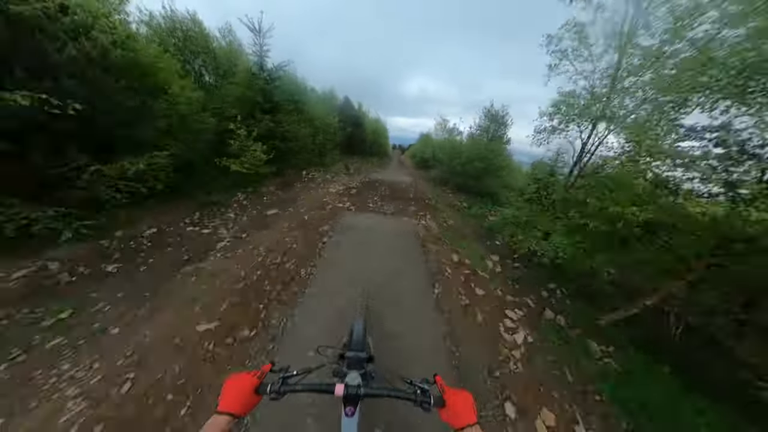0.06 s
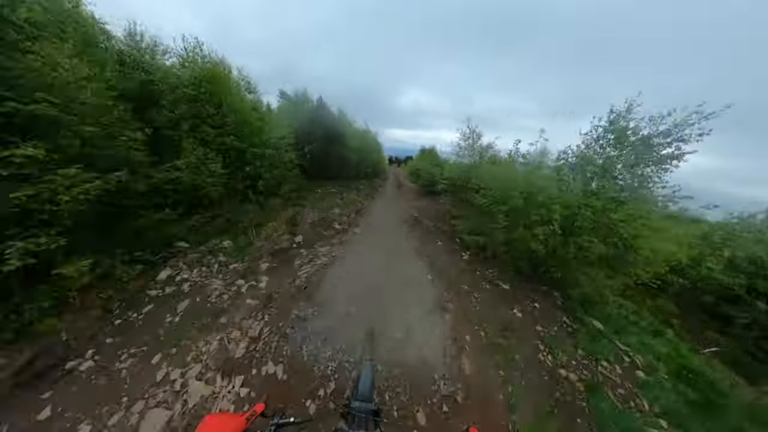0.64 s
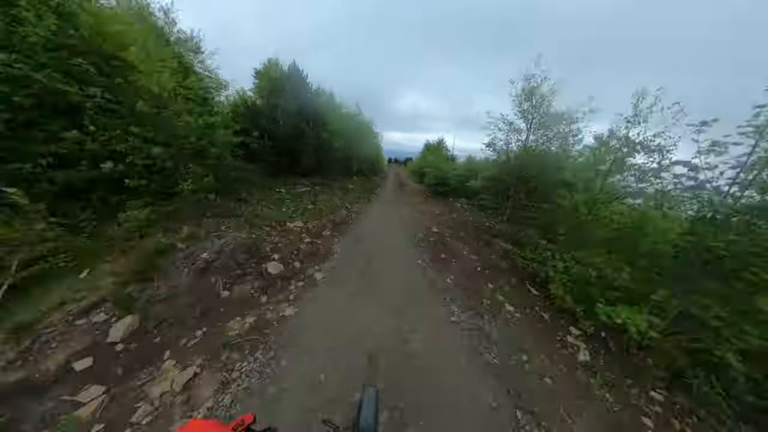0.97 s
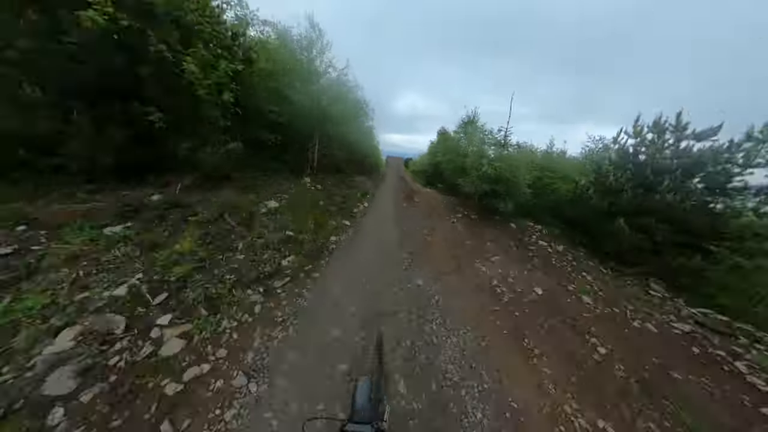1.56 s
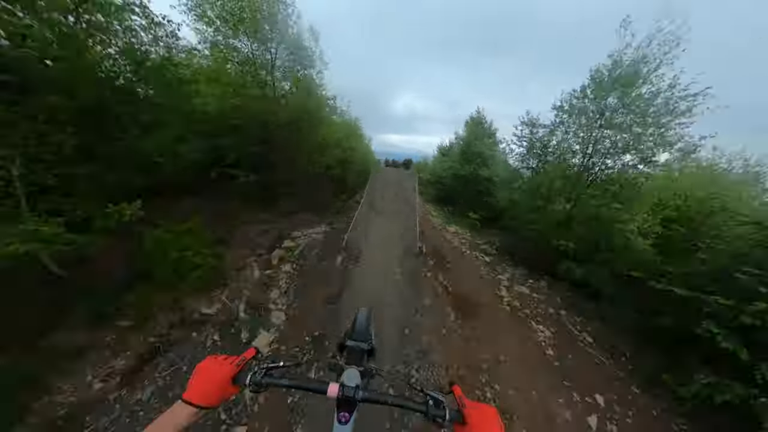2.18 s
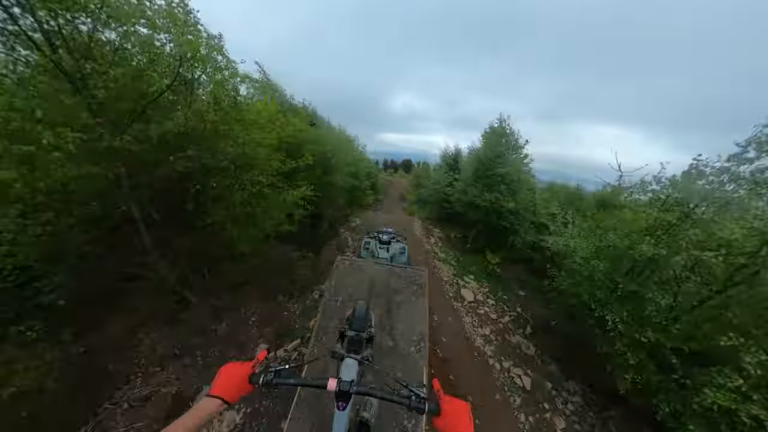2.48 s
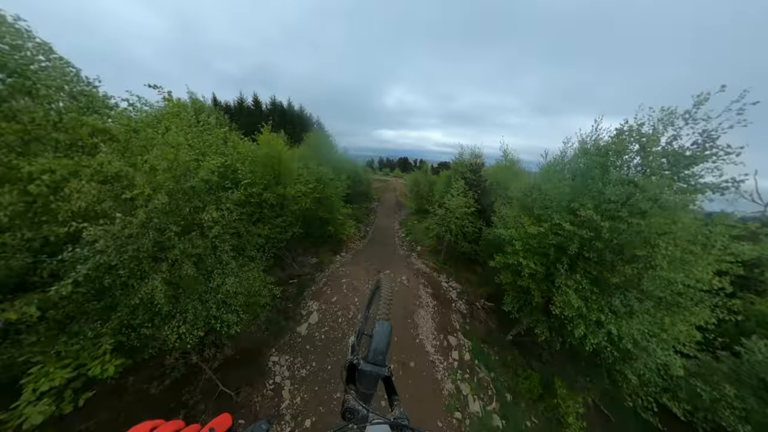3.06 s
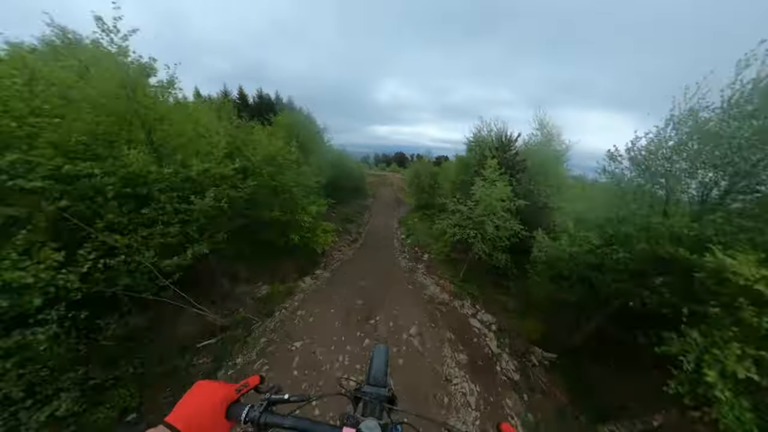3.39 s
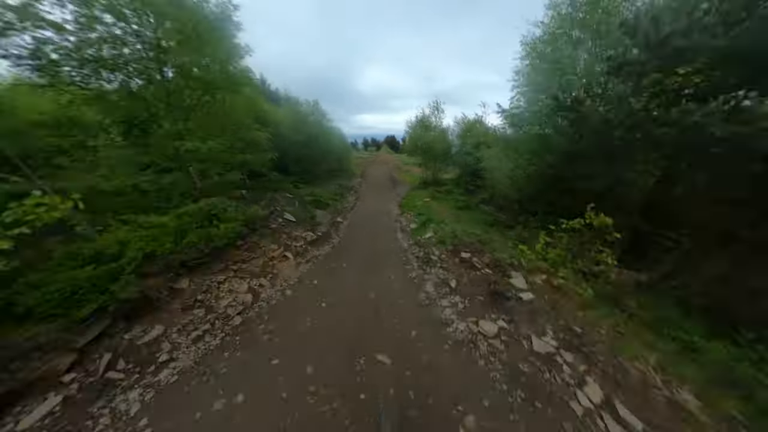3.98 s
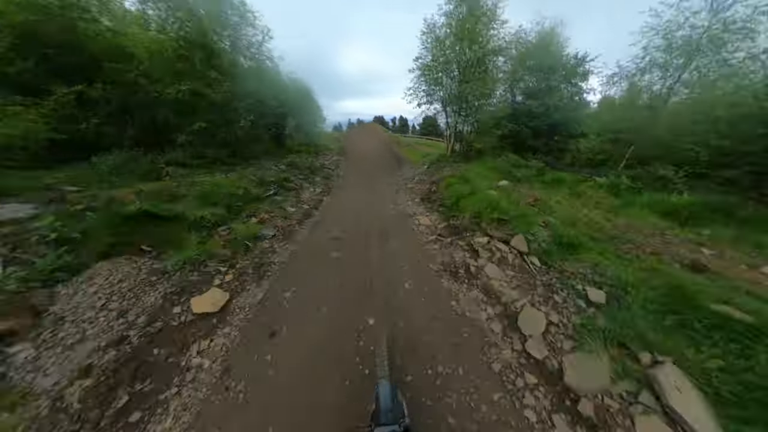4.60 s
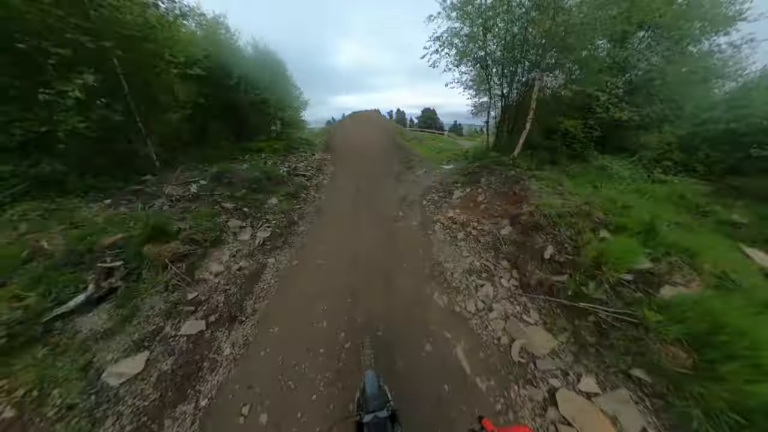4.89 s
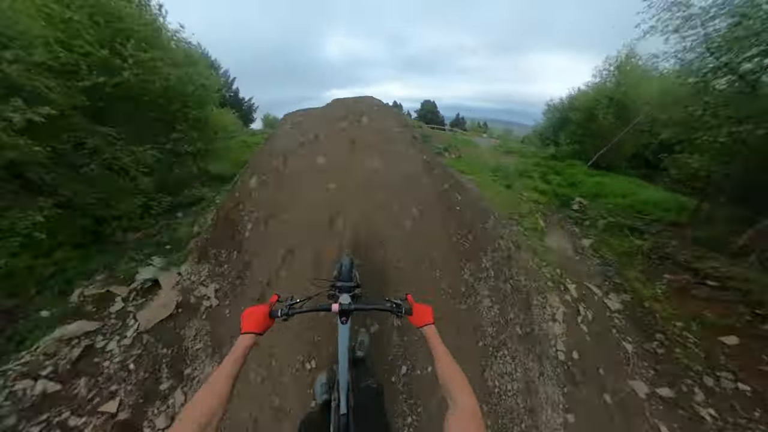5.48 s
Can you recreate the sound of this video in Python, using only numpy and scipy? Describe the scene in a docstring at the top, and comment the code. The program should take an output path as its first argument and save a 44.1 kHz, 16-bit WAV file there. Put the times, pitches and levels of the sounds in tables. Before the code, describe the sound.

A mountain bike speeds down a gritty trail in rumbling wind, stones knocking against it, with a thump and rattle after a jump.

```python
"""On a dirt jump trail, a mountain bike runs fast downhill, heard from the rider's helmet.
Wind buffets the microphone, and faint whistling notes come and go. The tyres roar as they
crush grit and fall silent over two jumps. Stones knock and tick against the bike. A blast of air
hits as the bike drops, then it lands with a thump and a clatter of chain and frame."""
import sys
import numpy as np
from scipy import signal
from scipy.fft import rfft, irfft
from scipy.io import wavfile
from scipy.ndimage import uniform_filter1d, minimum_filter1d

SR = 44100
rng = np.random.default_rng(int(sys.argv[2]) if len(sys.argv) > 2 else 0)


def materialize(psi):
    """Save the field psi as 16-bit PCM at rate SR to the path in sys.argv[1].

    A 1-D psi becomes a single channel; in a 2-D psi each row is a channel.
    """
    bounded = np.clip(np.atleast_2d(psi).T, -1, 1)
    quanta = np.round(bounded * 32767).astype(np.int16)
    wavfile.write(sys.argv[1], SR, quanta)


N = 248724
TIME = np.arange(N) / SR
FREQS = np.fft.rfftfreq(N, 1 / SR)

# Tone colours of the noises. Each row: frequency in Hz, relative level in dB.
SWELL_TONE = [(8, -6.5), (18, -2), (28, 1.5), (55, 0), (85, -3), (120, -19), (250, -50.5), (600, -100)]  # the slow push of the largest swirls of air
BUFFET_TONE = [(45, -41.5), (80, -0.5), (115, 2), (160, -5.5), (205, -7.5), (280, -15.5), (400, -33),
               (800, -66), (2000, -100)]  # the rumble of middle-sized swirls
EDDY_TONE = [(120, -23.5), (230, -5.5), (320, 1), (480, -6), (700, -15.5), (1100, -25.5), (2000, -39.5),
             (5000, -49), (12000, -85)]  # small swirls tearing off
BLAST_TONE = [(60, 3), (200, 11), (450, 11), (800, -7.5), (1300, -16), (2000, -22), (3100, -30),
              (4500, -57), (9000, -76.5)]
CRACK_TONE = [(300, -15), (700, 11), (1300, 7), (2000, -9), (3200, -15), (4500, -35), (9000, -63)]
ROAR_TONE = [(200, -25), (500, -2.5), (1000, 0), (1400, -4), (1800, -4), (2700, -8.5), (3600, -21.5),
             (5000, -28), (8000, -43), (15000, -62)]
GRIT_TONE = [(400, 2), (1100, 10.5), (2400, 7), (3400, 2), (4500, -0.5), (5050, -1.5), (6300, -4),
             (7200, -5.5), (8500, -14), (10000, -20.5), (13000, -35), (16000, -50)]
CLATTER_TONE = [(200, -18.5), (600, 8), (1000, 3.5), (1700, 5), (2300, -3.5), (3200, -6.5), (4500, -17),
                (6500, -17), (9000, -31), (12000, -58), (16000, -57.5)]
SCRAPE_TONE = [(2000, -4), (3900, 0.5), (5000, 4), (6300, 0), (8500, 0), (11000, -10.5), (15000, -38.5)]
FIZZ_TONE = [(7000, -20.5), (10500, -7), (13000, -9), (15500, -6.5)]

# Levels below compare rows within a table; the functions set the final loudness.
# The air's force on the helmet. Each row: time in seconds, dB above the usual force.
AIR_FORCE = [(0.0, -23), (0.32, 6.5), (0.46, -4), (1.22, -4), (1.32, 4), (1.68, 5), (1.78, 0), (2.15, 0),
             (2.35, -5.5), (2.8, 1.5), (3.25, -3), (3.62, 2), (3.68, -13), (4.05, 4.5), (4.35, -4),
             (4.55, -1), (4.7, -2.5), (4.95, -3.5), (5.28, -5), (5.64, -1.5)]
# Single gusts. Each row: peak time and length in seconds, then swell, buffet and eddy levels in dB.
GUSTS = [(0.1, 0.6, -19.5, -24.5, -34), (0.285, 0.031, -25, -17.5, -28), (0.335, 0.057, -20, -24, -33),
         (0.635, 0.13, -31, -29.5, -40), (0.851, 0.037, -21, -18, -36), (1.053, 0.098, -14.5, -26, -36),
         (1.148, 0.063, -28, -24.5, -31), (1.31, 0.052, -25, -22, -37), (1.615, 0.07, -18.5, -18.5, -29.5),
         (1.698, 0.029, -22, -13, -28.5), (2.158, 0.21, -30.5, -22, -38), (2.472, 0.03, -20, -20.5, -53),
         (2.529, 0.064, -13.5, -26, -30), (2.667, 0.093, -24.5, -24.5, -28),
         (2.792, 0.045, -23, -18.5, -51), (3.018, 0.19, -20, -27.5, -37.5),
         (3.241, 0.24, -29, -23.5, -31.5), (3.51, 0.046, -17, -19, -36), (3.599, 0.058, -40, -17.5, -45),
         (3.81, 0.1, -45, -29, -32.5), (4.0, 0.16, -21, -26.5, -52), (4.824, 0.064, -22.5, -23, -32.5),
         (4.912, 0.1, -18.5, -28, -38), (5.027, 0.15, -19.5, -25, -36.5), (5.492, 0.18, -19, -23, -35),
         (5.611, 0.042, -14.5, -20, -37)]
# The air briefly lets go. Each row: time and length in seconds, level change in dB.
LULLS = [(0.775, 0.038, -2.5), (1.1, 0.03, -4.5), (1.21, 0.071, -2.5), (1.766, 0.027, 0), (2.02, 0.052, -3),
         (2.882, 0.042, -3), (3.744, 0.04, -2.5), (4.269, 0.036, -5), (4.41, 0.064, -8), (5.2, 0.056, -1),
         (5.378, 0.044, -4.5)]
# Sharp blasts of air. Each row: peak time and length in seconds, level in dB.
BLASTS = [(0.33, 0.0077, -22), (2.639, 0.012, -30), (3.4, 0.048, -28.5), (3.432, 0.0067, -32),
          (3.453, 0.029, -30), (3.481, 0.048, -23.5), (3.485, 0.01, -23), (3.51, 0.013, -21),
          (3.623, 0.01, -29)]
# The hardest blasts hit the helmet. Each row: start in seconds, level in dB, fade time in seconds.
CRACKS = [(3.4865, -20.5, 0.0058), (3.4993, -27, 0.0084)]
# How hard the tyres work the ground. Each row: time in seconds, roar level in dB.
TYRE_LOAD = [(0.0, -40.5), (0.22, -39.5), (1.01, -45), (1.6, -46), (1.79, -50), (2.0, -41.5), (2.3, -49),
             (2.5, -45), (2.6, -46), (4.0, -58), (4.23, -50.5), (4.44, -43), (4.58, -45), (4.82, -40.5),
             (5.02, -45), (5.11, -46), (5.2, -42), (5.33, -39.5), (5.49, -41.5), (5.64, -37)]
# The two jumps. Each row: take-off and touch-down in seconds, fading of the roar in dB per second.
JUMPS = [(0.235, 0.966, 82.5), (2.595, 3.76, 132)]
# The fine hiss of passing air. Each row: time in seconds, level in dB.
AIR_HISS = [(0.0, -69), (0.33, -53.5), (0.52, -61.5), (1.4, -58.5), (2.35, -63.5), (2.98, -63.5),
            (3.07, -61), (3.17, -64.5), (3.36, -70), (3.95, -56.5), (4.25, -64), (4.45, -59), (4.66, -64.5),
            (4.84, -59), (5.0, -56.5), (5.1, -63), (5.22, -56), (5.64, -63.5)]
# Blows from stones, ramp, chain and suspension.
# Each row: start in seconds, level in dB, the crunch's fade time in seconds, pitch in Hz.
KNOCKS = [(0.079, -31, 0.0063, 1260), (0.155, -28.5, 0.003, 1205), (0.2247, -31, 0.0036, 1500),
          (0.238, -32, 0.0015, 2400), (0.3285, -23.5, 0.003, 483), (0.365, -39.5, 0.0053, 1090),
          (0.878, -38, 0.01, 1920), (1.234, -30.5, 0.0034, 1136), (1.696, -26.5, 0.0053, 1890),
          (1.856, -30.5, 0.003, 1840), (1.9913, -25, 0.0025, 1150), (1.991, -26, 0.002, 2190),
          (2.533, -24.5, 0.0025, 850), (3.746, -42.5, 0.013, 2000), (3.756, -31.5, 0.0075, 1910),
          (3.773, -22, 0.0026, 1380), (3.78, -24.5, 0.0043, 770), (3.779, -32.5, 0.0033, 3600),
          (3.792, -31, 0.005, 890), (3.81, -30.5, 0.0081, 702), (3.815, -26, 0.0061, 1765),
          (3.817, -34, 0.0025, 5540), (3.837, -32.5, 0.004, 1150), (3.8523, -19.5, 0.0026, 1580),
          (3.851, -25.5, 0.0022, 3500), (3.869, -31.5, 0.0022, 6630), (3.8772, -28, 0.0039, 5020),
          (3.8795, -29, 0.012, 670), (3.914, -32, 0.013, 1910), (3.925, -35, 0.02, 934),
          (4.812, -29.5, 0.01, 1340), (4.928, -28, 0.0089, 850)]
# The ringing of frame and bars. Each row: pitch in Hz, level in dB, seconds to fade by 60 dB.
FRAME_NOTES = [(671, 17, 0.07), (1640, -0.5, 0.09), (1760, 7, 0.09), (2400, -7.5, .04), (2780, -6.5, 0.02),
               (4470, -11, .04), (5950, -13.5, .02), (8400, -11.5, .03)]
# The wheels touch down. Each row: start in seconds, level in dB.
THUMPS = [(3.777, -5.5), (3.851, -32)]
# The tyres scrape on ramps and bite on landing.
# Each row: peak time and length in seconds, then coarse grain and grit spray levels in dB.
SCRAPES = [(0.28, 0.16, -64, -62), (2.5, 0.068, -74, -60.5), (3.804, 0.06, -67, -52),
           (3.888, 0.15, -61, -51), (5.63, 0.11, -67, -55.5)]
# Humming tyre knobs. Each row: start and length in seconds, first and last pitch in Hz, level in dB.
TREAD_NOTES = [(4.827, 0.11, 813, 820, -42.5), (4.832, 0.13, 1580, 1594, -50),
               (4.925, 0.081, 1535, 1696, -46), (4.97, 0.085, 1656, 1546, -50)]
# Ticks on metal. Each row: start in seconds, pitch in Hz, level in dB, rise time in seconds.
PINGS = [(1.4715, 8560, -56, 0.0004), (1.768, 8200, -54, 0.004), (2.533, 8200, -62, 0.001)]
# Faint whistling notes, and two brief high, hissy rings near 5 kHz.
# Each row: start and length in seconds, first and last pitch in Hz, level in dB, pitch spread in Hz.
WHISTLES_AND_RINGS = [(0.277, 0.14, 1930, 1900, -49, 160), (0.65, 0.29, 1850, 2030, -56.5, 220),
                      (.7, 0.15, 5100, 4640, -63, 400), (.66, 0.41, 2440, 2280, -58.5, 220),
                      (2.38, 0.26, 2020, 1770, -52, 130), (2.41, 0.43, 2610, 2900, -64, 240),
                      (2.85, 0.14, 2560, 2320, -63.5, 70), (2.818, 0.24, 1860, 1840, -61, 59),
                      (3.495, 0.06, 1870, 2190, -50, 90), (3.501, 0.052, 1000, 1134, -47, 60),
                      (3.955, 0.19, 1970, 2130, -53, 300), (5.14, 0.14, 5060, 4950, -64, 450)]
# A faint, very high fizz. Each row: time in seconds, level in dB.
FIZZ_LEVELS = [(0.0, -71), (0.3, -74), (0.75, -81), (1.05, -75), (1.38, -71.5), (1.7, -92)]


def wind():
    """Large swirls of air push on the microphone; small ones tear off where the pressure peaks."""
    swell = steadied(colour(noise(), SWELL_TONE), span_s=0.072)
    buffet = steadied(colour(noise(), BUFFET_TONE), span_s=0.045)
    ragged = gain_of(3.87 * evened(swell + buffet) + 0.33 * flutter(hz=45))
    eddies = steadied(colour(noise() * ragged, EDDY_TONE), span_s=0.02)
    eddies *= wind_strength(base_db=-39.5, follow=0.79, waver_db=1.4, gust_column=4)
    swell *= wind_strength(base_db=-21, follow=0.43, waver_db=1, gust_column=2)
    buffet *= wind_strength(base_db=-25, follow=0.94, waver_db=0.99, gust_column=3)
    return gain_of(0.14) * swell + gain_of(1.62) * buffet + gain_of(-2.0) * eddies


def wind_strength(base_db, follow, waver_db, gust_column):
    """One size of swirl follows the air's force, wavers, leaps in gusts and sinks in lulls."""
    force_db = np.interp(TIME, *np.transpose(AIR_FORCE))
    stream = gain_of(base_db + follow * force_db + waver_db * flutter(hz=10.4))
    gusts = sum(gain_of(gust[gust_column]) * bump(*gust[:2]) for gust in GUSTS)
    lulls = gain_of(sum(db * bump(peak, length) for peak, length, db in LULLS))
    return lulls * np.hypot(stream, gusts)


def air_blasts():
    """Air rushes past in ragged bursts while the bike flies and drops."""
    ragged = noise() * gain_of(5.2 * flutter(hz=220))
    rush = steadied(colour(ragged, BLAST_TONE), span_s=0.015)
    return rush * sum(gain_of(db) * bump(peak, length) for peak, length, db in BLASTS)


def air_cracks():
    """Air slaps the helmet's shell with a sudden, bright crack."""
    slap = steadied(colour(noise(), CRACK_TONE), span_s=0.004)
    return slap * sum(gain_of(db) * strike(start, 0.002, fade) for start, db, fade in CRACKS)


def tyres():
    """Tyre knobs crush grit: a roar that shivers with the ground, under a hiss of grit and air."""
    ground = flutter(hz=67.4)
    crushing = noise() + 1.03 * grains(per_s=800, spread_db=3)
    roar = colour(crushing * gain_of(1.3 * ground + 0.7 * flutter(hz=23)), ROAR_TONE)
    spray = noise() + 0.5 * grains(per_s=1800, spread_db=0)
    hiss = colour(spray * gain_of(0.29 * ground), GRIT_TONE)
    rolling = level(TYRE_LOAD) * ground_contact()
    scraped_up = sum(gain_of(db) * bump(peak, length) for peak, length, _, db in SCRAPES)
    thrown_grit = gain_of(-19) * rolling + scraped_up
    return gain_of(0.75) * roar * rolling + gain_of(6.5) * hiss * np.hypot(thrown_grit, level(AIR_HISS))


def ground_contact(return_s=0.033):
    """How much of the roar the jumps leave: 1 on the ground, falling towards 0 in the air."""
    share = np.ones(N)
    for take_off, touch_down, db_per_s in JUMPS:
        fading = gain_of(-db_per_s * np.maximum(TIME - take_off, 0))
        returning = np.clip((TIME - touch_down) / return_s, 0, 1)
        share *= np.maximum(fading, returning)
    return share


def knocks(focus_db=7.5, clack_cycles=1.5):
    """Each blow clacks and crunches at the pitch of the part it hits, and sets the frame ringing."""
    t = TIME[:SR // 4]
    frame = sum(gain_of(db - 60 * t / fade) * np.sin(2 * np.pi * hz * t) for hz, db, fade in FRAME_NOTES)
    clatter = rfft(colour(noise(), CLATTER_TONE))
    hardest_db = max(row[1] for row in KNOCKS)
    blows = np.zeros(N)
    for start, db, fade, hz in KNOCKS:
        octaves_away = abs(np.log2((FREQS + 1) / hz))
        pitched = irfft(clatter * gain_of(-focus_db * np.log2(1 + 3 * octaves_away)), N)
        crunch = steadied(pitched, span_s=0.0033) * strike(start, 0.0011, fade)
        clack = np.sin(2 * np.pi * hz * (TIME - start)) * strike(start, 0.00093, clack_cycles / hz)
        hardness = gain_of(6 + 0.5 * (db - hardest_db))  # stronger blows clack more
        blows += gain_of(db) * (hardness * clack + crunch)
    ring = evened(signal.oaconvolve(blows, frame)[:N]) * blows.std()
    return gain_of(-1.2) * (blows + gain_of(-11) * ring)


def landing(hz=62, rise_s=0.0027, fade_s=0.0078):
    """After the second jump, each tyre takes the weight with a low, short thump."""
    return sum(gain_of(db) * strike(start, rise_s, fade_s) * np.sin(2 * np.pi * hz * (TIME - start))
               for start, db in THUMPS)


def scrapes():
    """Coarse grains slip under the tyre knobs."""
    slip = sum(gain_of(db) * bump(peak, length) for peak, length, db, _ in SCRAPES)
    return colour(grains(per_s=3400, spread_db=0), SCRAPE_TONE) * slip


def tread_hum():
    """The knobs hum a rough note and its octave as the tyres press into a dip."""
    return sum(fuzzy_tone(*row, spread_hz=45) for row in TREAD_NOTES)


def pings(overtones=(1.41, 1.29), ring_s=0.0056, chink_s=0.0018, grit_s=0.012):
    """Small stones and chain links chink on metal, ring briefly and scatter a little grit."""
    bright = [(4000, -42), (8000, 8), (12000, -3), (15000, -13)]  # each pair: Hz, dB
    chink = gain_of(5) * colour(noise(), bright)
    grit = gain_of(-5) * colour(grains(per_s=2500, spread_db=-1), bright)
    ticks = np.zeros(N)
    for start, hz, db, rise in PINGS:
        phase = 2 * np.pi * hz * TIME
        ring = np.sin(phase) + 0.35 * sum(np.sin(phase * ratio) for ratio in overtones)
        for part, fade in (ring, ring_s), (chink, chink_s), (grit, grit_s):
            ticks += gain_of(db) * part * strike(start, rise, fade)
    return ticks


def whistles_and_rings():
    """Faint whistling notes come and go, along with two brief high, hissy rings."""
    return sum(fuzzy_tone(*row) for row in WHISTLES_AND_RINGS)


def fizz():
    """A faint, very high fizz during the first second and a half."""
    return colour(noise() + 0.6 * grains(per_s=2500, spread_db=2), FIZZ_TONE) * level(FIZZ_LEVELS)


def fuzzy_tone(start, length, first_hz, last_hz, db, spread_hz):
    """Noise narrowed to an unsteady note that swells, glides and fades."""
    pitch = np.interp(TIME, [start, start + length], [first_hz, last_hz])
    arch = np.sin(np.pi * np.clip((TIME - start) / length, 0, 1))
    note = resonate(resonate(noise(), pitch, spread_hz), pitch, spread_hz)
    return gain_of(db) * arch * steadied(note, span_s=0.082)


def resonate(x, pitch, spread_hz):
    """Keeps the part of a sound that lies near a moving pitch."""
    turn = np.exp(2j * np.pi * np.cumsum(pitch) / SR)
    feedback = np.exp(-np.pi * spread_hz / SR)
    return 2 * (turn * signal.lfilter([1 - feedback], [1, -feedback], x / turn)).real


def noise():
    """An even hiss: white noise."""
    return rng.standard_normal(N)


def grains(per_s, spread_db):
    """Random clicks; a spread of 0 makes them all the same size."""
    size = gain_of(spread_db * np.minimum(rng.exponential(1, N), 4))
    return evened(size * rng.choice([-1, 1], N) * (rng.random(N) < per_s / SR))


def flutter(hz):
    """A smooth random wobble, mostly slower than the given rate."""
    return evened(irfft(rfft(noise()) / (1 + (FREQS / hz) ** 4), N))


def colour(x, tone):
    """Gives a sound a tone colour, at an average strength of 1."""
    hz, db = np.transpose(tone)
    gains = gain_of(np.interp(np.log(FREQS + 1), np.log(hz), db))
    return evened(irfft(rfft(x) * gains, N))


def steadied(x, span_s):
    """Keeps the quick lumps of a noise and evens out its slow drift."""
    size = int(span_s * SR)
    power = uniform_filter1d(uniform_filter1d(x ** 2, size), size)
    return x / np.sqrt(abs(power) + 1e-9)


def strike(start, rise_s, fade_s):
    """The quick rise and fade of a blow."""
    age = np.maximum(TIME - start, 0)
    return (1 - np.exp(-age / rise_s)) * np.exp(-age / fade_s)


def bump(peak, length):
    """A smooth swell and fall around a moment."""
    return np.exp(-np.minimum((2 * (TIME - peak) / length) ** 2, 50))


def level(rows):
    """Joins rows of time and dB into a volume curve, silent outside them."""
    return gain_of(np.interp(TIME, *np.transpose(rows), left=-200, right=-200))


def evened(x):
    """Scales a signal to an average strength (rms) of 1."""
    return x / np.sqrt(np.mean(x ** 2) + 1e-20)


def gain_of(db):
    """Turns decibels into a number to multiply by."""
    return 10 ** (np.asarray(db) / 20)


def scene():
    """All the sounds together at the helmet, in one channel."""
    return (wind() + air_blasts() + air_cracks() + whistles_and_rings() + tyres() + fizz()
            + scrapes() + tread_hum() + knocks() + pings() + landing())[None]


def record(dry, ceiling_db=-7, limiter_s=0.019, top_hz=15700):
    """A limiter turns down the loudest peaks; the microphone loses the very highest treble."""
    size = int(limiter_s * SR)
    needed = np.minimum(1, gain_of(ceiling_db) / (abs(dry) + 1e-9))
    held = minimum_filter1d(needed, 2 * size)
    limited = dry * uniform_filter1d(uniform_filter1d(held, size), size)
    treble_cut = signal.cheby1(12, 0.05, top_hz, fs=SR, output="sos")
    return signal.sosfiltfilt(treble_cut, limited, padlen=2000)


dry = scene()
out = record(dry)
materialize(out)
```